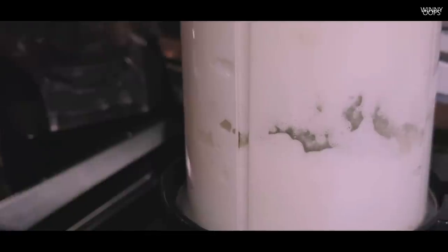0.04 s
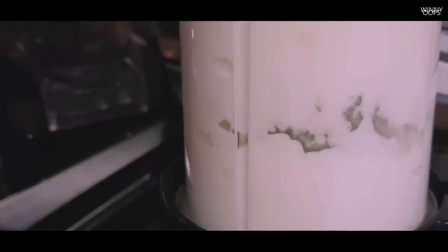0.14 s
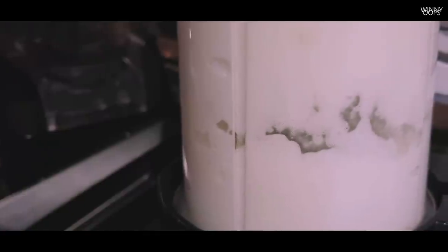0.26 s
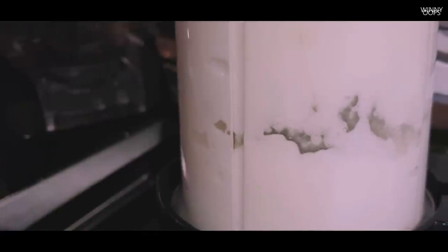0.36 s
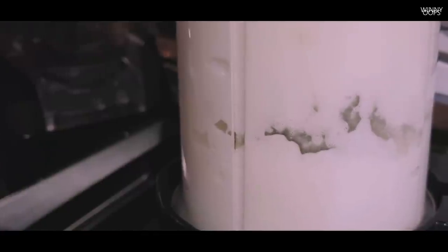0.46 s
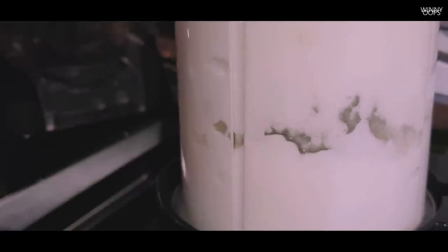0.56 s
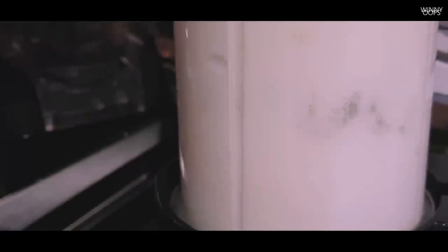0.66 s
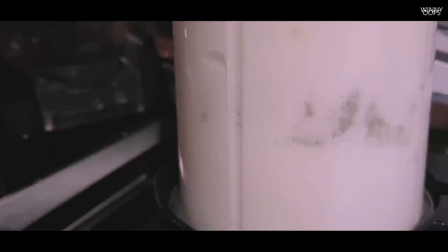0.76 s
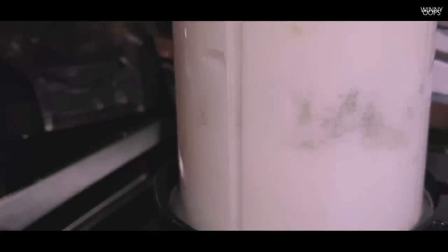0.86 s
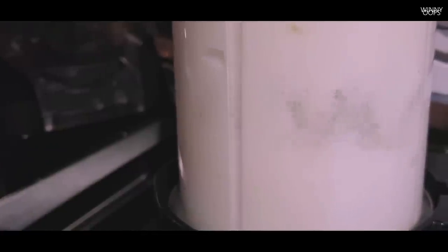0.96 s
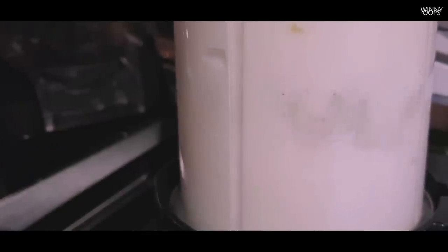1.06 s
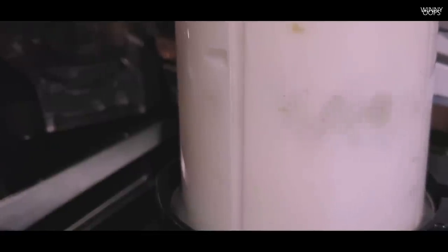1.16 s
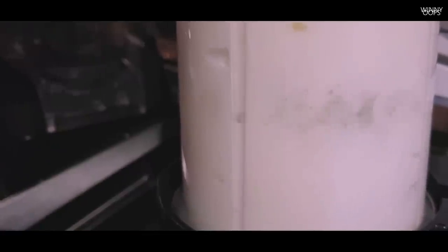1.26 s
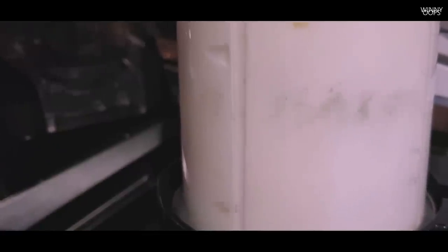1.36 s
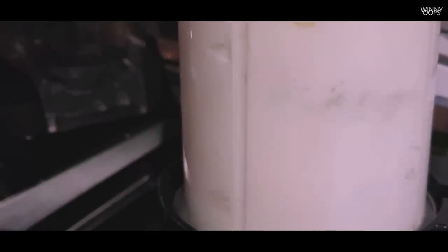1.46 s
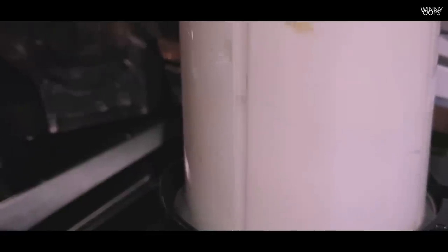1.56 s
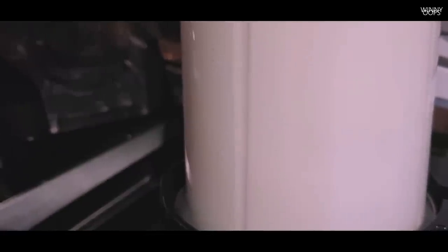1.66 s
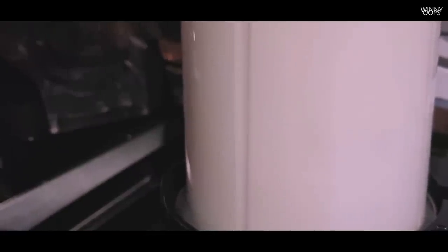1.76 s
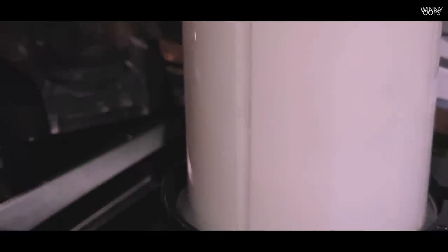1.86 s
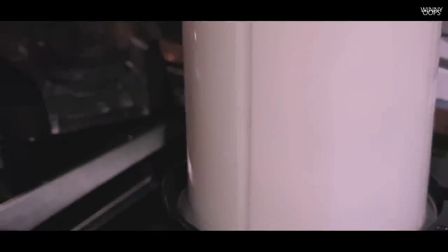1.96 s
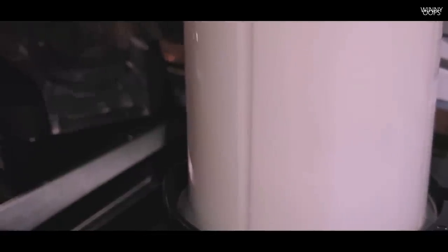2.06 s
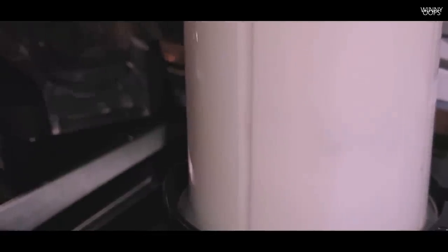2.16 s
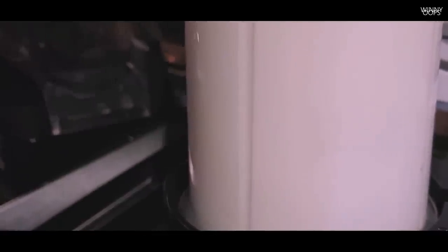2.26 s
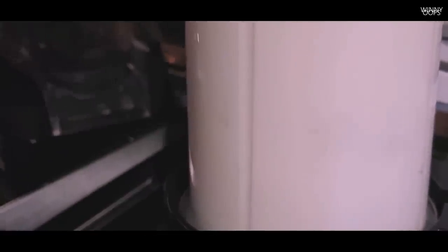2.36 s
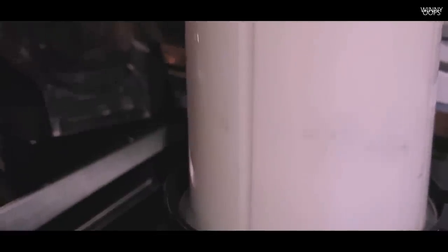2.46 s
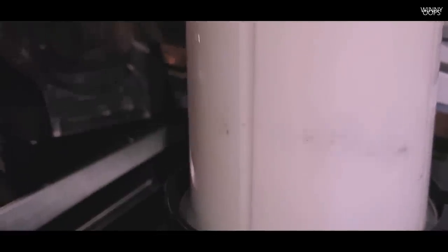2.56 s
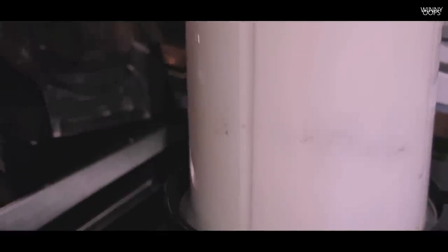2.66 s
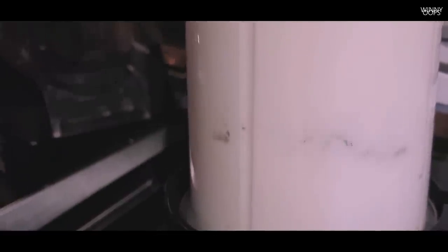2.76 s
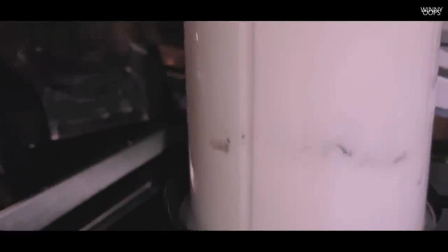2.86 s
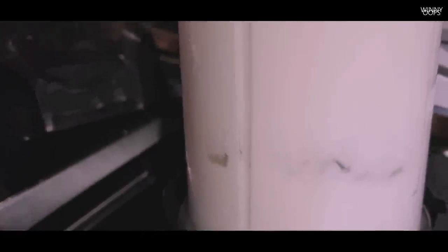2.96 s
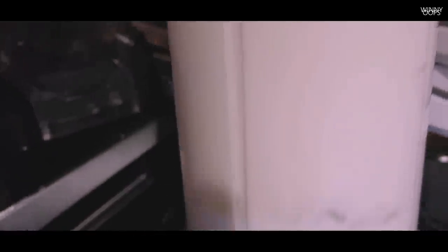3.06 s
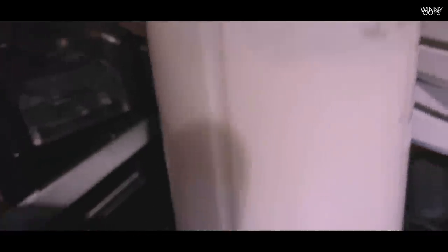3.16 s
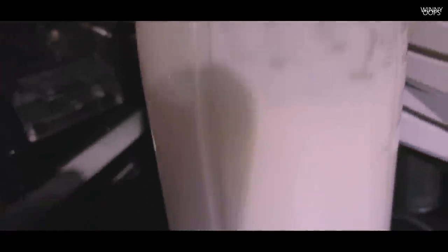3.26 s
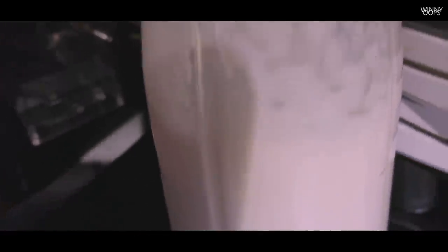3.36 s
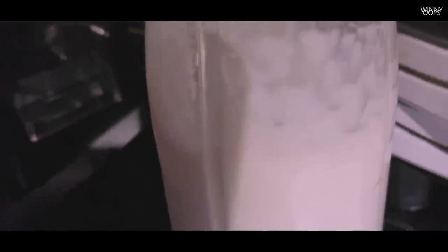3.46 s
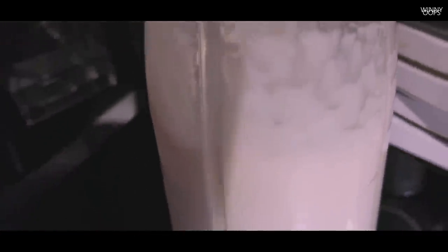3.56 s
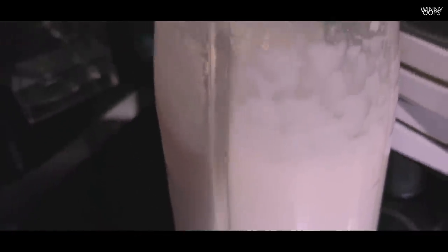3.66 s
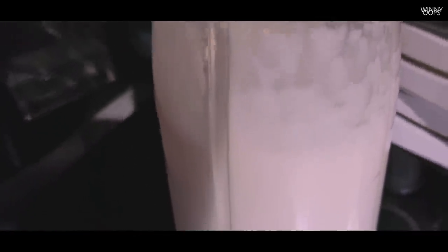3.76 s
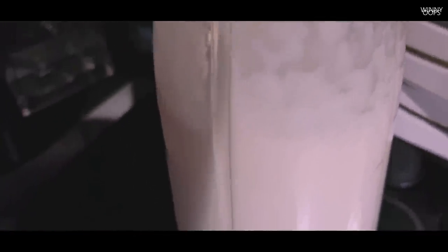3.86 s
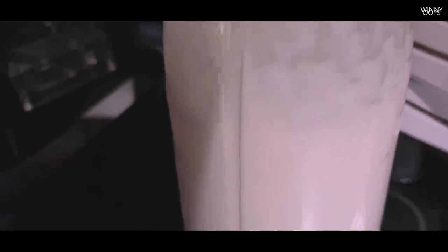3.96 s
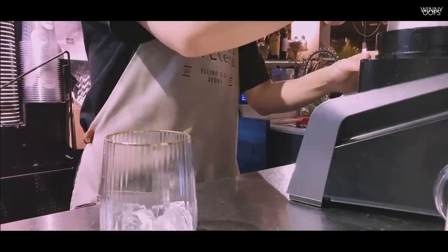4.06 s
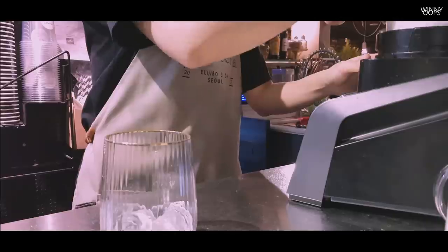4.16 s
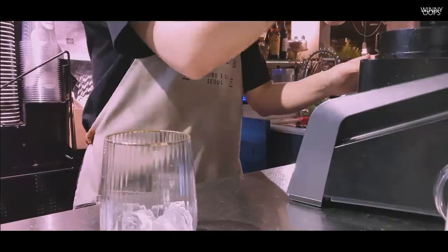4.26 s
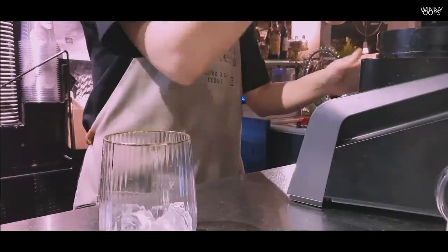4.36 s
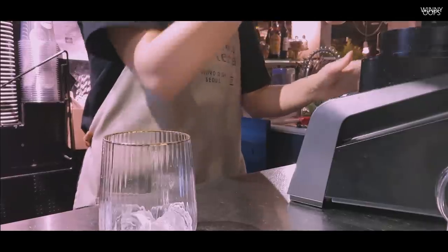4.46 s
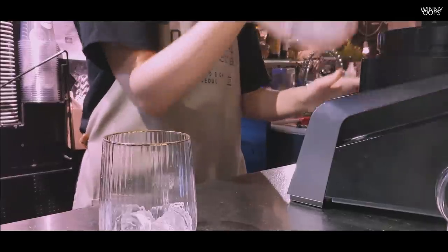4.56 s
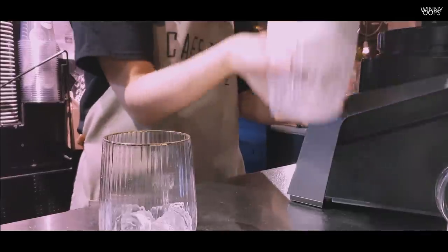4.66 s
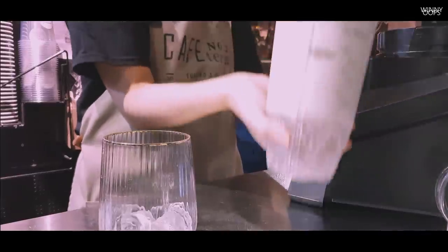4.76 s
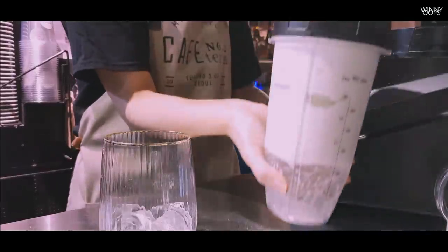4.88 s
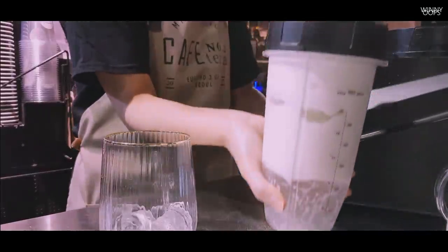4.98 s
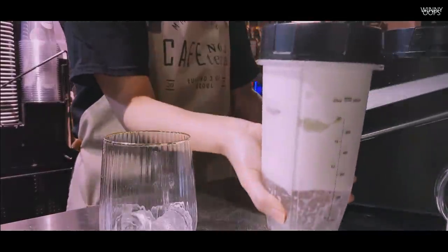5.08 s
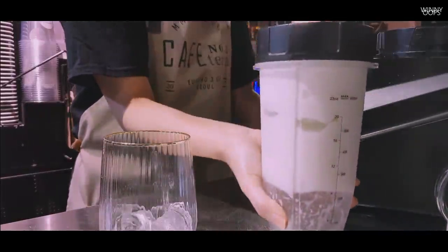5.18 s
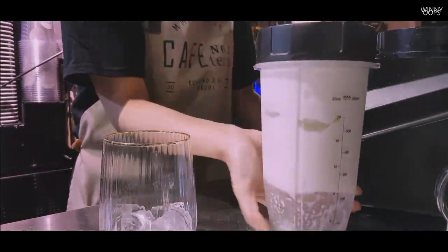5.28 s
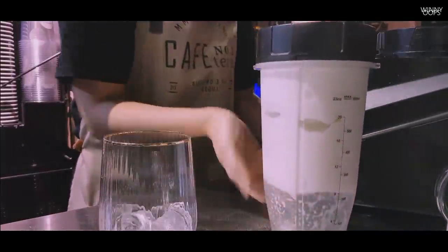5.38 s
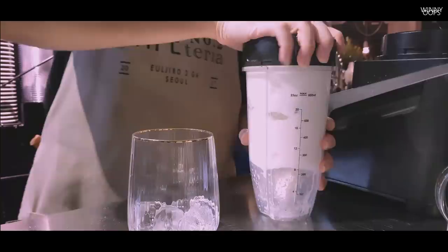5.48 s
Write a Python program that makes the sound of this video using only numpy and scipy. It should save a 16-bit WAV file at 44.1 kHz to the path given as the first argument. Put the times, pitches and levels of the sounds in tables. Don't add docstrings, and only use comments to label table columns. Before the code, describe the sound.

An earlier blender spin dies in slowing ticks, then one pulse of about a second roars and hisses over ice. Ice clatters hardest at switch-off, and the swirling drink fades with a few clicks. After an abrupt change of scene, plastic scrapes as the cup is freed, then lands with a knock and quick rattling bounces in a small, soft room. A faint finger squeak ends it; the close microphone is dull on top.

```python
import sys
import numpy as np
from scipy import signal
from scipy.fft import rfft, irfft, next_fast_len
from scipy.io import wavfile

SR = 44100
rng = np.random.default_rng(int(sys.argv[2]) if len(sys.argv) > 2 else 0)


def field_ratio(decibels):
    return 10 ** (np.asarray(decibels, dtype=float) / 20)


def transcribe(u):
    v = np.clip(np.atleast_2d(u).T, -1, 1)
    q = np.round(v * 32767).astype(np.int16)
    wavfile.write(sys.argv[1], SR, q)


N = 243431

POWER_ON_S, POWER_OFF_S = 0.556, 1.68
SCENE_CHANGE_S = 4.094

# time in seconds, speed in turns per s, unbalance tone in dB.
SHAFT_RUN = [(0.82, 240.9, -49.2), (0.88, 259.4, -40.9), (1.03, 292.7, -39), (1.22, 315.6, -37.3),
             (1.4, 327.2, -38.4), (1.56, 332.8, -38.3), (1.65, 330.1, -42), (1.69, 304.2, -36),
             (1.77, 243.9, -46.5), (1.82, 255.0, -50.2), (1.88, 270.2, -48.9), (1.95, 272.2, -45),
             (2.03, 270.5, -46.3), (2.1, 248.6, -48.1), (2.22, 200, -59), (2.4, 164.2, -61.5),
             (2.72, 131, -63.5), (2.93, 111.4, -78)]
# multiple of the shaft speed, level in dB against the unbalance tone.
SHAFT_OVERTONES = [(1.5, -13), (2, -2.5), (2.5, -11), (3, -5.5)]
# time in seconds, level in dB.
SWIRL_PULSES = [
    [(0, -63), (.28, -70), (.4, -74), (.552, -84)],
    [(.556, -62), (.59, -44), (.8, -42), (1.57, -40), (1.78, -39), (1.84, -45), (2.06, -42), (2.24, -48),
     (2.34, -46), (2.7, -50), (3.1, -55.5), (3.6, -59), (3.85, -65), (4.09, -72)],
]
# time in seconds, rattle in dB, shudder in dB,
# seconds to build 10 dB, seconds to clear 10 dB.
ICE_JAMS = [(.303, -66, -56, .025, .018), (.655, -34.5, -31, .08, .012), (.692, -35, -31, .02, .06),
            (.79, -45, -31, .07, .07), (1.0, -34, -50, .25, .6), (1.692, -19, -29, .075, .05),
            (1.766, -19.5, -35, .03, .018), (1.998, -24, -33, .09, .06), (2.08, -28, -39, .05, .1),
            (2.16, -30, -36, .05, .06), (2.28, -41, -48, .05, .03), (2.738, -55, -51, .04, .08),
            (3.132, -48, -49, .012, .012), (3.256, -48, -51, .02, .04), (3.585, -58, -50, .015, .03)]
# frequency in Hz, density in dB per Hz.
RUMBLE_SPECTRUM = [(18, -84.5), (30, -64.5), (160, -18.5), (255, -14), (304, -12), (426, -11.5),
                   (578, -1.5), (748, -13), (864, -13), (1400, -16), (1820, -38.5), (3080, -120)]
# frequency in Hz, density in dB per Hz.
HISS_SPECTRUM = [(2180, -13.5), (3700, -4), (4170, -3), (4540, -7.5), (4870, -1.5), (5000, -31), (5280, -7),
                 (5810, -6), (6950, -9), (7380, -4), (9590, -50), (16200, -120)]
# frequency in Hz, width in Hz, level in dB.
HOUSING_MODES = [(487, 45, -8), (588, 24, 0), (835, 50, -9), (995, 70, -12)]
# frequency in Hz, width in Hz, level in dB.
IDLE_HOUSING_MODES = [(270, 150, -9), (472, 32, 1), (582, 35, -1), (1000, 60, -11)]
# frequency in Hz, width in Hz, level in dB.
SLUSH_MODES = [(1570, 110, -5), (2105, 45, 1.5), (1850, 1100, -8)]
# frequency in Hz, width in Hz, level in dB.
CUP_WALL_MODES = [(2940, 160, 3), (3407, 343, 8.5), (2084, 340, 0), (5150, 210, -21)]
# time in seconds, peak in dB.
ICE_LUMPS = [(0.6264, -25), (0.6404, -20), (0.6574, -20.5), (0.6898, -23), (0.9266, -23), (1.2954, -22),
             (1.3754, -23.5), (1.5973, -18), (1.6247, -15), (1.6432, -13), (1.6741, -7), (1.6866, -7.5),
             (1.6914, -9.5), (1.7024, -11), (1.7144, -12.5), (1.7254, -10.5), (1.7649, -7.5),
             (1.7704, -10.5), (1.823, -19), (1.9145, -17.5), (1.9614, -11.5), (1.9909, -12.5), (2.002, -14),
             (2.0493, -16.5), (2.0822, -12.5), (2.1029, -14), (2.1124, -14.5), (2.1444, -14), (2.1595, -13),
             (2.2034, -21)]
# time in seconds, high ring in dB, low ring in dB.
COUPLING_TICKS = [(0.0044, -49, -43), (0.0282, -36.5, -44), (0.0563, -40, -47), (0.0842, -36, -43),
                  (0.1151, -44, -46), (0.147, -41, -52), (0.179, -50, -51), (0.221, -52, -57),
                  (0.2653, -42, -62), (0.3162, -40, -59), (0.3824, -50.5, -67), (0.4174, -56, -78),
                  (2.443, -36, -48), (2.6419, -28, -50), (2.9244, -32.5, -46), (3.1267, -30.5, -56),
                  (3.2437, -48, -58), (3.2525, -39, -55), (3.3494, -38, -56), (3.519, -36, -44),
                  (3.637, -45, -45), (3.9653, -52, -69)]
# frequency in Hz, level in dB, decay t60 in seconds.
COUPLING_MODES = [(1755, 0, .03), (3050, -3, .018), (3550, -2, .022)]
# time in seconds, peak in dB, crack in dB against the peak.
CUP_KNOCKS = [(4.094, -35, -20), (4.098, -46, -10), (4.118, -51, -15), (4.27, -49, -11),
              (5.107, -16.5, -19), (5.114, -38, -2), (5.126, -27, -25), (5.173, -21.5, -9),
              (5.2, -27, -14.5), (5.223, -29.5, -15.5), (5.26, -33, -18), (5.27, -38, -17),
              (5.329, -41, -36), (5.347, -49, -23), (5.368, -50, -17)]
# frequency in Hz, level in dB, decay t60 in seconds.
COUNTER_MODES = [(149, -7, 0.084), (172.3, -3, 0.052), (273, 0.5, 0.057), (323, -2.5, 0.042),
                 (408, -7, 0.035), (557, -11, .03), (656, -8, 0.03), (1088, -19, .025)]
# frequency in Hz, level in dB, decay t60 in seconds.
RIM_MODES = [(1300, -3, .015), (2250, -5, .015), (2750, 0, .014), (4400, -4, .01)]
# frequency in Hz, density in dB per Hz.
BUZZ_SPECTRUM = [(35, -58), (60, -28), (200, -3), (324, -4), (435, -8.5), (501, -11.5), (852, -14),
                 (1030, -10), (2500, -30), (3250, -54), (5500, -120)]
# time in seconds, dull rub in dB, bright scrape in dB,
# seconds to build 10 dB, seconds to fade 10 dB.
HAND_TOUCHES = [(4.1, -42, -60, .002, .015), (4.14, -60, -72, .03, .2), (4.226, -46, -55, .016, .045),
                (4.27, -48, -54, .05, .016), (4.33, -67, -78, .03, .15), (4.496, -67, -78, .008, .1),
                (4.782, -68, -83, .01, .025), (4.838, -69, -85, .01, .035), (5.012, -72, -86, .12, .025),
                (5.1, -60, -68, .04, .004), (5.29, -61, -73, .02, .08), (5.33, -55, -77, .01, .01),
                (5.416, -66, -79, .2, .12), (5.49, -69, -76, .08, .05)]
# frequency in Hz, density in dB per Hz.
RUB_SPECTRUM = [(35, -48), (60, -32.5), (189, -20), (302, -7), (584, -7.5), (725, -9.5), (1500, -22),
                (1950, -38), (3300, -120)]
# frequency in Hz, density in dB per Hz.
SCRAPE_SPECTRUM = [(710, -18), (1200, -15.5), (1720, -26), (2030, -3), (2590, -7), (3450, -6.5),
                   (5970, -12), (7380, -17), (9590, -42), (16200, -120)]
# time in seconds, pitch in Hz, level in dB.
FINGER_SQUEAK = [
    (5.38, 790, -77),
    (5.40, 790, -69),
    (5.46, 816, -68),
    (5.49, 820, -64),
    (5.5, 850, -82),
]
# time in seconds, narrow rustle in dB,
# seconds to build 10 dB, seconds to fade 10 dB.
FINGER_SLIDES = [
    (4.33, -76, .05, .3),
    (4.49, -76, .2, .2),
    (5.39, -75, .015, .3),
    (5.485, -76, .2, .012),
]
# time in seconds, hiss in dB.
BASE_BRUSH = [
    (5.03, -84),
    (5.042, -64),
    (5.06, -68),
    (5.1, -71),
]
# frequency in Hz, density in dB per Hz.
ROOM_SPECTRUM = [(12, -68.5), (20, -51), (113, -21.5), (204, -13.5), (243, -12), (319, -23), (352, -6),
                 (389, -8), (797, -18), (858, -15.5), (1370, -24), (1800, -28), (2090, -26), (5760, -21.5),
                 (7380, -19.5), (9590, -48.5), (16200, -120)]
# frequency in Hz, density in dB per Hz.
AIR_SPECTRUM = [(7600, -22), (7900, -2.5), (9000, -2.5), (11300, -4.5), (11700, -13.5), (15300, -15.5),
                (15800, -36.5)]


def motor():
    speed, level_db = in_time([SHAFT_RUN])
    turns = np.cumsum(np.maximum(speed, 0) * (1 + 0.0008 * drift(30))) / SR
    phase = 2 * np.pi * turns
    powered = np.clip((POWER_OFF_S - np.arange(N) / SR) / 0.03, 0, 1)
    effort = powered * np.clip((speed - 230) / 100, 0, 1)
    overtones = sum(field_ratio(db + 3.5 * drift(25)) * np.sin(k * phase) for k, db in SHAFT_OVERTONES)
    commutator_order, commutator_db = 13, -42
    whine = field_ratio(commutator_db + 1.5 * drift(15)) * effort * np.sin(commutator_order * phase)
    unbalance = field_ratio(level_db + 2.5 * (1 - powered) * drift(35))
    return np.sqrt(2) * (unbalance * (np.sin(phase) + effort ** 3 * overtones) + whine)


def work():
    t = np.arange(N) / SR
    swirl = in_time(SWIRL_PULSES)[0] + 44
    slosh = 2.5 * np.clip(-swirl / 20, 0, 1)
    laws = (-44.5, 0.78), (-44.2, 1.02), (-43.5, 0.92), (-45.5, 1.1)
    from_swirl = np.array([field_ratio(db + share * swirl + slosh * drift(28)) for db, share in laws])

    since = np.maximum(t - POWER_ON_S, 0)
    powered = np.clip((POWER_OFF_S - t) / 0.06, 0, 1)
    drive_db, drive_rise_s = -36.3, 0.007
    drive = field_ratio(drive_db) * powered * (1 - np.exp(-since / drive_rise_s))
    full_speed_hz, speed_power = 330, 3.3
    coasting = (np.maximum(in_time([SHAFT_RUN])[0], 0) / full_speed_hz) ** speed_power
    blade_db, blade_rise_s = -35.3, 0.17
    driven = powered * (1 - np.exp(-since / blade_rise_s))
    blade = field_ratio(blade_db) * (driven + (1 - powered) * coasting)

    s, rattle_db, shudder_db, build, clear = np.transpose(ICE_JAMS)
    moving = (t < 0.34) | (t > POWER_ON_S)
    jam = swells(s, rattle_db, build, clear) * (t > POWER_ON_S)
    shudder = swells(s, shudder_db, build, clear) * moving
    jam_slush, jam_hiss = field_ratio(-12) * jam, field_ratio(-18) * jam
    return np.hypot(from_swirl, [np.hypot(drive, shudder), jam_slush, jam, np.hypot(blade, jam_hiss)])


def blending(rumble_gain, slush_gain, rattle_gain, hiss_gain):
    surge = drift(39.67)
    white = rng.standard_normal((5, N))
    vortex = np.interp(np.arange(N) / SR, [0.555, 0.556, 2.35, 2.9], [0, 1, 1, 0])

    busy = resonate(white[0], HOUSING_MODES, patchy_db=0.6)
    idle = resonate(white[4], IDLE_HOUSING_MODES, patchy_db=2.5)
    housing = 0.74 * np.sqrt(vortex) * busy + 1.02 * np.sqrt(1 - vortex) * idle
    housing += (0.42 + 0.3 * vortex) * coloured(white[1], RUMBLE_SPECTRUM)

    slush = resonate(grains(6000, 2.6), SLUSH_MODES, patchy_db=1.5)
    rattle = resonate(grains(3500 * field_ratio(2.6 * drift(70)), 2.5), CUP_WALL_MODES, patchy_db=1.0)

    whistle = resonate(white[2], [(5165, 110, 0)], patchy_db=1.0)
    whistle_db = -5 + 5.2 * (0.5 - vortex)
    hiss = coloured(white[3], HISS_SPECTRUM) + field_ratio(whistle_db) * whistle

    return (rumble_gain * field_ratio(0.43 * surge) * housing + slush_gain * field_ratio(0.62 * surge) * slush
            + rattle_gain * field_ratio(0.8 * surge) * rattle + hiss_gain * field_ratio(0.79 * surge) * hiss)


def lumps():
    lump_s, lump_db = np.transpose(ICE_LUMPS)
    chance = rng.random((140, 2))
    chip_s = POWER_ON_S + 1.8 * chance[:, 0]
    s, rattle_db, _, build, clear = np.transpose(ICE_JAMS)
    jam = swells(s, rattle_db, build, clear)[(chip_s * SR).astype(int)]
    spread_db = 4.0
    chip_db = 20 * np.log10(jam) + 4.0 - 2 * spread_db * chance[:, 1]
    wall = [(hz, db, 3.9 / width) for hz, width, db in CUP_WALL_MODES]
    times, levels_db = np.r_[lump_s, chip_s], np.r_[lump_db, chip_db] - 9.0
    return strike(times, levels_db, wall, scatter_db=0, contact_s=0.0018)


def coupling():
    s, high_db, low_db = np.transpose(COUPLING_TICKS)
    low = strike(s, low_db, COUPLING_MODES[:1], scatter_db=0, contact_s=0.004)
    high = strike(s, high_db - 4, COUPLING_MODES[1:], scatter_db=1, contact_s=0.002)
    return low + high


def knocks():
    s, level_db, crack_db = np.transpose(CUP_KNOCKS)
    crack_db = level_db + crack_db
    thud = strike(s, level_db - 6.5, COUNTER_MODES, scatter_db=2.0, contact_s=0.00375)
    crack = strike(s, crack_db - 7.0, RIM_MODES, scatter_db=2.5, contact_s=0.0016)
    white = rng.standard_normal((2, N))
    buzz = dying(s, level_db - 15.0, tau_s=0.012) * coloured(white[0], BUZZ_SPECTRUM)
    slap = dying(s, crack_db - 13.5, tau_s=0.011) * coloured(white[1], SCRAPE_SPECTRUM)
    return thud + crack + buzz + slap


def handling():
    s, rub_db, scrape_db, build, fade = np.transpose(HAND_TOUCHES)
    rub = coloured(rng.standard_normal(N), RUB_SPECTRUM) * field_ratio(3.2 * drift(90))
    scrape = coloured(grains(3000 * field_ratio(4.1 * drift(120)), 2.8), SCRAPE_SPECTRUM)
    return swells(s, rub_db - 1.5, build, fade) * rub + swells(s, scrape_db, build, fade) * scrape


def squeak():
    pitch, level_db = in_time([FINGER_SQUEAK])
    phase = 2 * np.pi * np.cumsum(np.maximum(pitch, 0) * (1 + 0.035 * drift(200))) / SR
    tone = field_ratio(level_db + 4.2 * drift(96)) * (np.sin(phase) + 0.6 * np.sin(2 * phase))
    white = rng.standard_normal((2, N))
    rustle = resonate(white[0], [(1640, 110, -2), (1750, 93, 0)], patchy_db=4.5)
    brush = resonate(white[1], [(4300, 400, 0), (3000, 900, -11)], patchy_db=1)
    brush_gain = field_ratio(in_time([BASE_BRUSH])[0])
    return tone + swells(*np.transpose(FINGER_SLIDES)) * rustle + brush_gain * brush


def room(x):
    t60_s = 0.23
    t = np.arange(int(0.3 * SR)) / SR
    tail = rng.standard_normal(len(t)) * field_ratio(-60 * t / t60_s) * (t > 0.004)
    tail = signal.lfilter([0.4], [1, -0.6], tail)
    return signal.fftconvolve(x, tail / np.sqrt(np.sum(tail ** 2)))[:N]


def room_tone():
    step_db = np.where(np.arange(N) / SR < SCENE_CHANGE_S, -9, 0)
    level_db = -67 + step_db + 0.47 * drift(2.9)
    return field_ratio(level_db) * coloured(rng.standard_normal(N), ROOM_SPECTRUM)


def air(hiss_gain):
    room_db = -82 + np.where(np.arange(N) / SR < SCENE_CHANGE_S, -6.5, 0)
    click = dying([SCENE_CHANGE_S], -58, tau_s=0.0017)
    level = hiss_gain * field_ratio(-41) + field_ratio(room_db) + click
    return level * coloured(rng.standard_normal(N), AIR_SPECTRUM)


def strike(times, levels_db, modes, scatter_db, contact_s):
    at, out = (np.asarray(times) * SR).astype(int), np.zeros(N)
    chance = rng.standard_normal((len(at), len(modes)))
    t = np.arange(int(contact_s * SR) + 3)
    for k, (hz, level_db, t60) in enumerate(modes):
        clicks = np.full(N, 1e-18)
        clicks[at] = field_ratio(levels_db + level_db + scatter_db * chance[:, k])
        r, w = field_ratio(-60 / (t60 * SR)), 2 * np.pi * hz / SR
        push = np.hanning(len(t)) * np.cos(w * t)
        swell = signal.oaconvolve(clicks, push / np.sum(push * np.cos(w * t)))[:N]
        ring = signal.lfilter([np.sin(w), -np.sin(w)], [1, -2 * r * np.cos(w), r * r], swell)
        out += ring / (2 * np.sin(w / 2))
    return out


def resonate(x, peaks, patchy_db):
    out = 0
    for k, (hz, width, level_db) in enumerate(peaks):
        r = np.exp(-np.pi * width / SR)
        b = (1 - r * r) / 2 * np.array([1, 0, -1])
        ring = signal.lfilter(b, [1, -2 * r * np.cos(2 * np.pi * hz / SR), r * r], x + 1e-18)
        out = out + (-1) ** k * field_ratio(level_db + patchy_db * drift(11)) * ring
    return rms_one(out)


def coloured(x, spectrum):
    hz, level_db = np.transpose(spectrum)
    size = next_fast_len(N)
    log_hz = np.log(np.fft.rfftfreq(size, 1 / SR) + 1)
    shape = field_ratio(np.interp(log_hz, np.log(hz), level_db, left=-90, right=-90))
    return rms_one(irfft(rfft(x, size) * shape, size)[:N])


def rms_one(x):
    return x / np.sqrt(np.mean(x ** 2) + 1e-20)


def grains(per_s, spread_db):
    sizes = field_ratio(spread_db * np.minimum(rng.exponential(1, N), 5)) * rng.choice([-1, 1], N)
    return sizes * (rng.random(N) < per_s / SR)


def drift(rate):
    knots = rng.standard_normal(1200)
    return np.interp(np.arange(N) / SR * rate, np.arange(len(knots)), knots)


def swells(s, level_db, build_s, fade_s):
    coarse = np.arange(0, N, 32)
    t = coarse[:, None] / SR - s
    gain = field_ratio(level_db - 10 * np.where(t < 0, -t / build_s, t / fade_s))
    return np.interp(np.arange(N), coarse, np.sqrt(np.sum(gain ** 2, axis=1)))


def dying(times, levels_db, tau_s):
    jumps = np.full(N, 1e-18)
    jumps[(np.asarray(times) * SR).astype(int)] = field_ratio(levels_db)
    return signal.lfilter([1], [1, -np.exp(-1 / (tau_s * SR))], jumps)


def in_time(spans):
    out = np.full((len(spans[0][0]) - 1, N), -150.)
    for rows in spans:
        s, *columns = np.transpose(rows)
        inside = np.arange(int(s[0] * SR), min(int(s[-1] * SR), N))
        out[:, inside] = [np.interp(inside / SR, s, c) for c in columns]
    return out


def scene():
    gains = work()
    blows = lumps() + coupling() + knocks()
    near = motor() + blending(*gains) + blows + field_ratio(-16.5) * room(blows) + handling() + squeak()
    rounded = 0.81 * np.tanh((near + room_tone()) / 0.82)
    narrow = signal.sosfilt(signal.cheby2(12, 55, 8000, fs=SR, output="sos"), rounded)
    return (narrow + air(gains[3]))[None]


def roll_off(x):
    return signal.sosfilt(signal.butter(12, 15720, fs=SR, output="sos"), x)


def record(dry):
    thin = signal.sosfilt(signal.butter(1, 25, "high", fs=SR, output="sos"), dry)
    return roll_off(thin)


dry = scene()
out = record(dry)
transcribe(out)
```